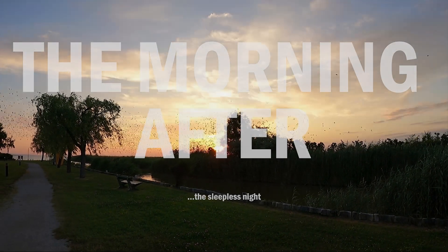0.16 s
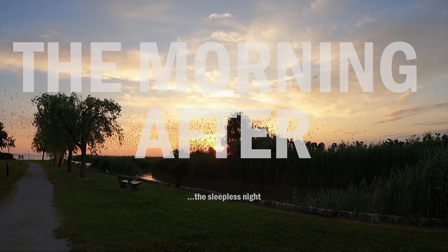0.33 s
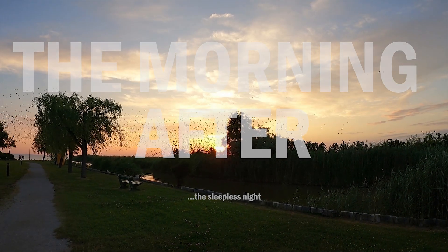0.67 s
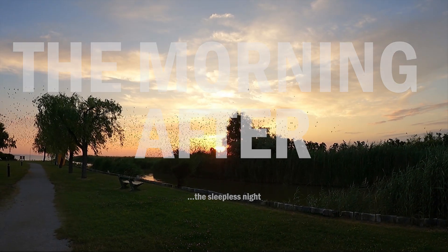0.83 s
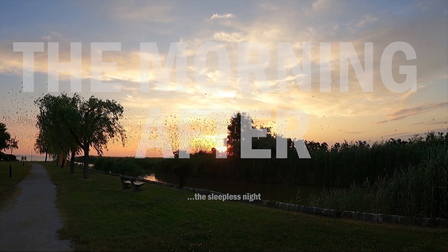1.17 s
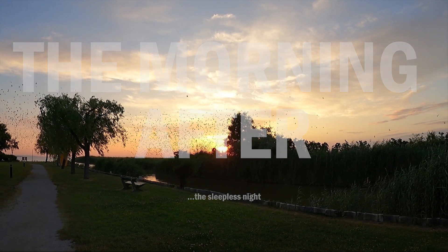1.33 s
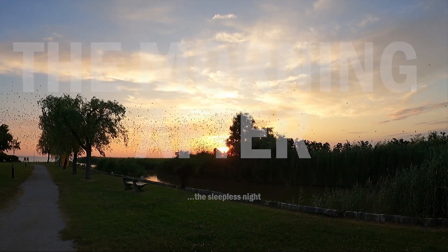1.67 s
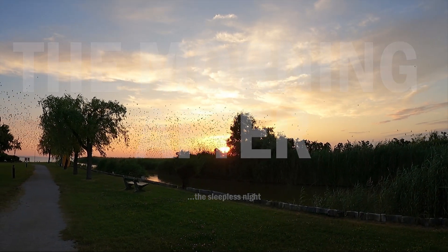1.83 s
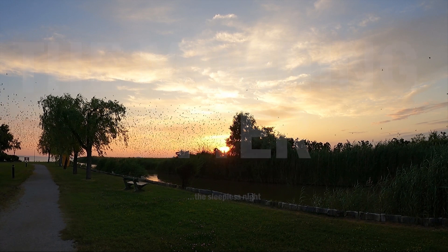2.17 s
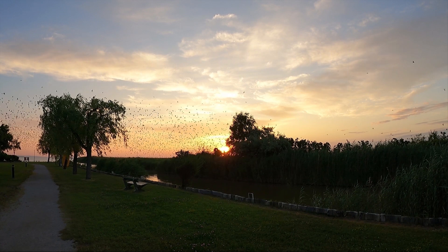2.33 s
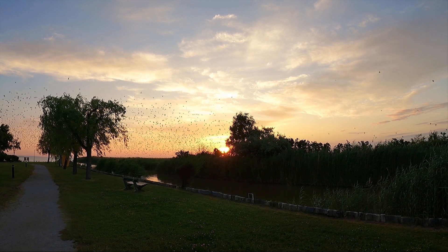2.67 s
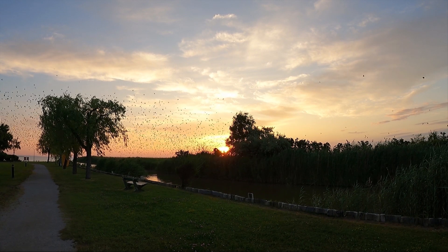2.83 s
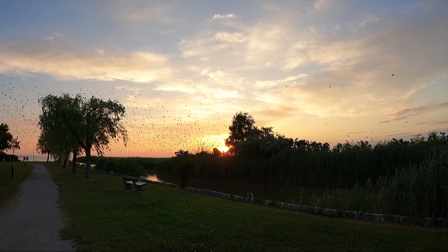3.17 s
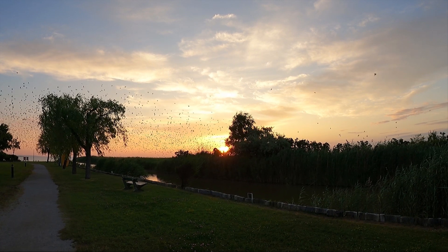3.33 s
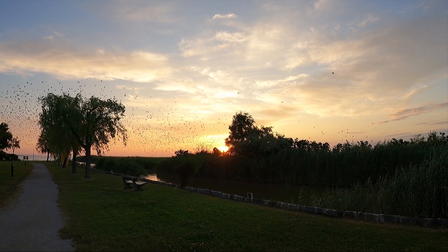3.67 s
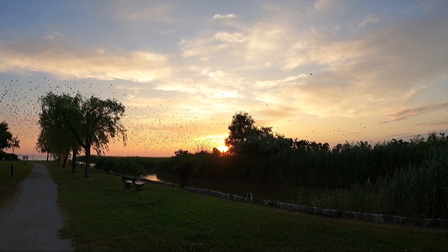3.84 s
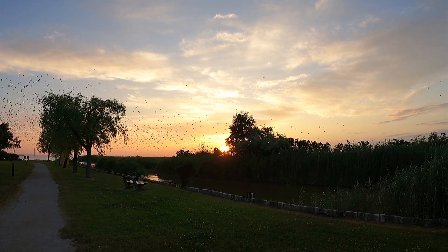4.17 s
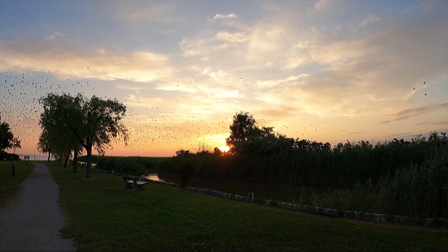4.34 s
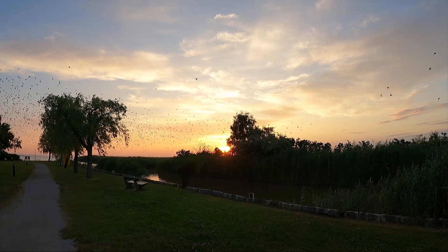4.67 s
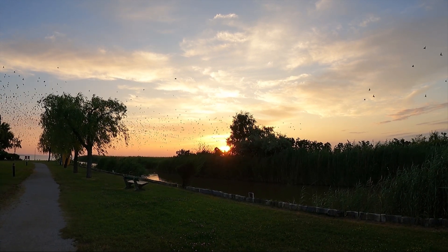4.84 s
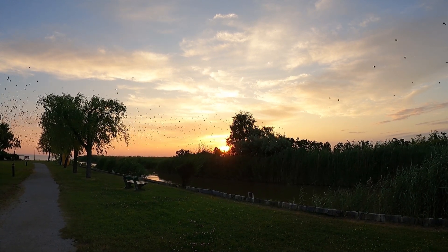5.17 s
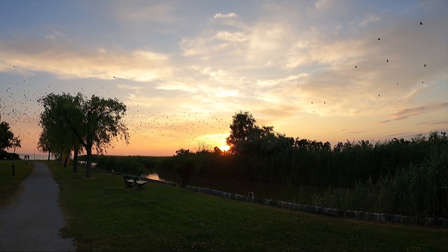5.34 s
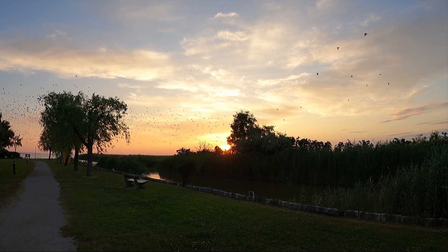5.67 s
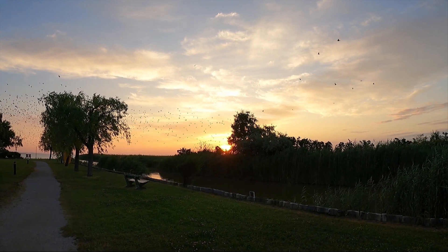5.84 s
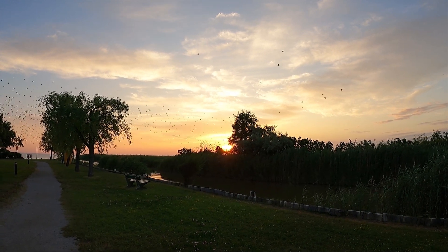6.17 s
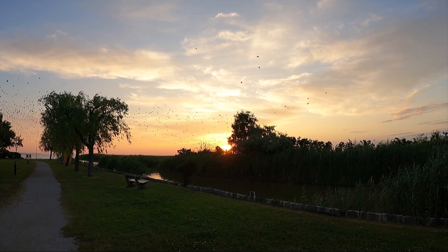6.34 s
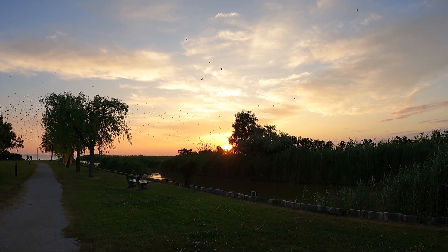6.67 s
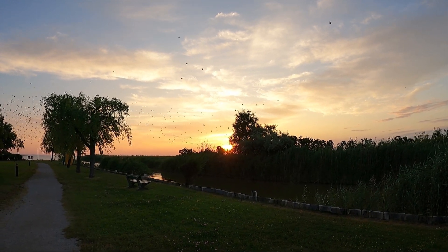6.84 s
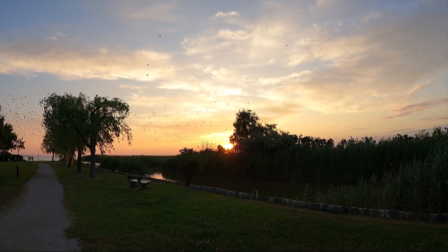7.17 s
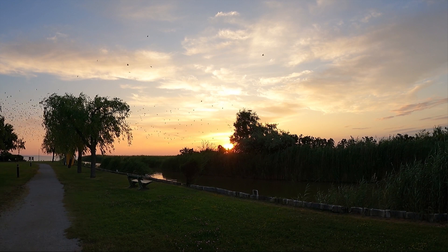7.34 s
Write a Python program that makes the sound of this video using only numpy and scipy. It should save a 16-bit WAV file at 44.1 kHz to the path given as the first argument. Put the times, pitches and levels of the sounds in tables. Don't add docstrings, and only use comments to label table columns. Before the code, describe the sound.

Many small birds chatter with hoarse, fast-trilled chirps, mostly to the left, over soft airy rush, low wind rumble and occasional handling ticks.

```python
import sys
import numpy as np
from scipy import signal
from scipy.fft import rfft, irfft
from scipy.io import wavfile
from scipy.ndimage import uniform_filter1d

SR = 44100
rng = np.random.default_rng(int(sys.argv[2]) if len(sys.argv) > 2 else 0)


def nominal_scale(level):
    x = np.asarray(level, float) / 20
    return 10 ** x


def store_wav(level_fs):
    pcm = np.round(np.clip(np.atleast_2d(level_fs), -1, 1) * 32767)
    wavfile.write(sys.argv[1], SR, pcm.T.astype(np.int16))


N = 330849


def evened(x):
    return x / np.sqrt(np.mean(x ** 2) + 1e-20)


def read(points, hz):
    f, value = np.transpose(points)
    return np.interp(np.log(hz + 1), np.log(f + 1), value)


def columns(rows, t):
    s, *rest = np.transpose(rows)
    return [np.interp(t, s, c) for c in rest]


def add(mix, s, sound):
    part = mix[:, round(s * SR):][:, :sound.shape[1]]
    part += sound[:, :part.shape[1]]


def wander(size, s):
    n = max(int(s * SR), 2)
    smooth = uniform_filter1d(rng.standard_normal(size), n)
    return evened(uniform_filter1d(smooth, n))


def placed(x, pan_db, lag):
    late = np.interp(np.arange(len(x)) - lag, np.arange(len(x)), x)
    pair = np.array([late * nominal_scale(pan_db / 2), x / nominal_scale(pan_db / 2)])
    return pair * 2 / np.hypot(nominal_scale(pan_db / 2), nominal_scale(-pan_db / 2)) / np.sqrt(2)


def hiss(field_db, patchy_db, size):
    # f/Hz, likeness (0 to 1)
    likeness = [(25, 0.54), (60, 0.88), (160, 0.93), (1150, 0.67), (1880, 0.39), (3000, 0.51)]
    lag_s = .00006
    frames = 4 * N // size + 5
    hz = np.fft.rfftfreq(size, 1 / SR)[:, None]
    a, b, c, d, patches = rng.standard_normal((frames, len(hz), 5)).T
    patches = evened(uniform_filter1d(uniform_filter1d(patches, 12, 0), 12, 1))
    same = np.clip(read(likeness, hz), -1, 1)
    right = a + 1j * b
    left = same * right * np.exp(-2j * np.pi * hz * lag_s) + np.sqrt(1 - same ** 2) * (c + 1j * d)
    z = np.array([left, right]) * nominal_scale(patchy_db * patches)
    z /= np.sqrt(np.mean(abs(z) ** 2))
    t = (np.arange(frames) * size / 4 / SR)[None]
    return signal.istft(z * nominal_scale(field_db(hz, t)), nperseg=size, noverlap=size * 3 // 4)[1][:, :N]


def churr(hz, trill_hz, swing, hoarse, gate_db):
    # multiple of the main pitch, level/dB
    partials = [(1.329, 7.5), (1.67, 0.5), (2, -14.5), (2.5, -26), (3, -25)]
    n = len(hz)
    beat = 2 * np.pi * (np.cumsum(trill_hz * (1 + .11 * wander(n, .015))) / SR + rng.random())
    half = beat / 2 + 2 * np.pi * rng.random()
    flutter = np.sin(beat) + 0.577 * np.sin(half)
    turns = 2 * np.pi * np.cumsum(hz * (1 + swing * flutter + hoarse * wander(n, 0.0012))) / SR
    stroke = 0.26 * np.cos(half) - np.cos(beat + rng.random() - .5)
    pulse = evened(nominal_scale(gate_db * stroke + 3.93 * wander(n, 0.0012)))
    upper = sum(nominal_scale(db) * np.sin(k * turns + 1.7 * wander(n, 0.00081)) for k, db in partials)
    under = nominal_scale(-15.5) * np.sin(.75 * turns + wander(n, 0.00083))
    return pulse * (np.sin(turns) + under) * np.sqrt(2), np.sqrt(pulse) * upper


def air():
    # t/s, level/dB, extra level of the low part/dB
    rush = [
        (0, -58.5, 5),
        (1.5, -57, -3.5),
        (4, -58.5, -5.5),
        (7.5, -59.5, -10),
    ]
    # f/Hz, level per Hz/dB
    colour = [(120, -25), (200, 0.5), (280, -10), (550, -3.5), (842, -7.5), (1010, -4), (3020, -1.5),
              (4090, -2), (6710, -10.5), (10800, -31.5), (12100, -33.5), (13900, -67)]

    def field_db(hz, t):
        level_db, low_db = columns(rush, t)
        return read(colour, hz) + level_db + low_db / (1 + (hz / 900) ** 2)
    return hiss(field_db, patchy_db=1.57, size=1024) * nominal_scale(-1.0)


def wind():
    # t/s, level/dB
    gusts = [(0.0, -41.5), (2.09, -47.5), (2.28, -36), (2.48, -47), (3.05, -47), (3.65, -40), (3.68, -38),
             (3.89, -48), (4.55, -46), (4.58, -48), (5.28, -47), (5.56, -54.5), (5.7, -45), (6.18, -54.5),
             (6.52, -42.5), (6.56, -51.5), (6.98, -43), (7.5, -51)]
    # f/Hz, level per Hz/dB
    colour = [(7.1, -56), (12, -6.5), (32, 7), (51, -2), (177, -19), (246, -34), (320, -33), (420, -37),
              (700, -120)]

    def field_db(hz, t):
        return read(colour, hz) + columns(gusts, t)[0]
    return hiss(field_db, patchy_db=1.0, size=2048) * nominal_scale(2.5)


def far_flock(count=40, size=500):
    # t/s, level/dB
    loudness = [
        (0, -50),
        (.6, -61),
        (1.1, -40.5),
        (2.3, -49),
        (4.4, -46),
        (6.3, -47.5),
        (7.5, -38),
    ]
    spread_db = 4.0
    out, calls = np.zeros((2, N)), []
    for length, pitch, pan, lag in rng.random((count, 4)):
        u = np.linspace(0, 1, int((0.0529 + 0.1008 * length) * SR))
        hz = (2500 + 2300 * np.sqrt(pitch)) * (1.03 - 0.06006 * u)
        tone, upper = churr(hz, 70 + 45 * length, swing=0.06, hoarse=0.0297, gate_db=1.0)
        call = (tone + nominal_scale(-22.5) * upper) * np.sin(np.pi * u)
        calls.append(placed(call, 10 * pan - 1.5, 6 * lag))
    for s, bird, loud in rng.random((size, 3)):
        add(out, s * N / SR, calls[int(bird * count)] * nominal_scale(spread_db * loud))
    return evened(out) * nominal_scale(columns(loudness, np.arange(N) / SR)[0])


def trees(x):
    t = np.arange(int(.25 * SR)) / SR
    chosen = rng.random((3, len(t))) < .03
    common, left, right = rng.standard_normal((3, len(t))) * chosen
    taps = (common + .6 * np.array([left, right])) * (t > .002) * nominal_scale(-60 * t / .15)
    return signal.fftconvolve(x, taps / np.linalg.norm(taps[0]), axes=1)[:, :N]


def ticks():
    # t/s, peak level/dB, ring f/Hz, thump level/dB, crack level/dB
    knocks = [
        (.178, -40, 1200, -6, 0),
        (1.779, -37, 1900, -12, 0),
        (2.22, -40, 2500, -20, 6),
        (2.279, -24, 700, 1, -2),
        (2.815, -39, 2500, -10, 6),
        (4.327, -25, 960, -10, -4),
        (4.967, -31, 620, -10, 0),
    ]
    out, t = np.zeros((2, N)), np.arange(1500) / SR
    for s, peak_db, hz, thump_db, crack_db in knocks:
        ring = np.sin(2 * np.pi * hz * t) * nominal_scale(-60 * t / .01)
        thump = nominal_scale(thump_db) * np.sin(2 * np.pi * 330 * t) * nominal_scale(-60 * t / 0.011)
        crack = nominal_scale(crack_db) * wander(len(t), .00012) * nominal_scale(-60 * t / 0.003)
        knock = -nominal_scale(peak_db) * (ring + thump + crack) * np.minimum(t / 0.00041, 1)
        add(out, s, placed(knock, pan_db=5.0, lag=1.47))
    return out


def peeps():
    # t/s, f/Hz, level/dB
    blips = [
        (1.707, 4220, -29),
        (2.54, 3810, -32),
        (5.956, 3960, -29.5),
        (6.21, 3710, -32),
        (7.331, 4000, -29.5),
        (7.388, 5300, -33.5),
    ]
    out, t = np.zeros((2, N)), np.arange(500) / SR
    for s, hz, level_db in blips:
        blip = np.sin(2 * np.pi * hz * t) * np.minimum(t / 0.00069, 1) * nominal_scale(level_db + 9.0 - 60 * t / 0.039)
        add(out, s, placed(blip * signal.windows.tukey(len(t), .2), pan_db=7.8, lag=2.4))
    return out


def whistles():
    # t/s, f/Hz, level/dB
    notes_sung = [
        [(1.352, 3900, -36), (1.368, 5050, -34), (1.398, 5800, -37), (1.43, 4000, -35)],
        [(4.73, 4400, -37), (4.742, 5600, -36), (4.754, 4500, -33), (4.762, 5700, -38), (4.774, 5900, -38),
         (4.79, 4300, -36)],
        [(5.785, 5800, -48), (5.83, 5500, -46)],
        [(5.87, 5400, -52), (5.89, 6500, -52)],
        [(7.42, 6150, -44), (7.5, 6290, -40)],
    ]
    out = np.zeros((2, N))
    for rows in notes_sung:
        t = np.arange(rows[0][0] - .004, rows[-1][0] + 0.0062, 1 / SR)
        hz, level_db = columns(rows, t)
        hz = uniform_filter1d(hz, 120) * (1 + .007 * wander(len(t), .004))
        tone = np.sin(2 * np.pi * np.cumsum(hz) / SR) * nominal_scale(level_db + 1.5 * wander(len(t), .003))
        add(out, t[0], placed(tone * signal.windows.tukey(len(t), .2), pan_db=9, lag=3))
    return out


def strain_db(t):
    # t/s, hold/s, overtone level/dB
    strains = [(.55, .01, -60.5), (0.696, .14, -59), (0.927, 0.0092, -54.5), (1.085, 0.21, -54.5),
               (1.4, .01, -56), (1.535, .01, -50), (1.68, .01, -57.5), (1.84, 0.0091, -52),
               (2.072, 0.039, -51.5), (2.496, 0.035, -53.5), (2.652, 0.0091, -49.5), (2.817, .01, -61),
               (2.936, .03, -54.5), (3.203, 0.038, -51.5), (3.6, 0.011, -51.5), (3.83, .1, -57.5),
               (3.976, .05, -53.5), (4.545, 0.24, -51.5), (4.948, .03, -50.5), (5.15, .01, -55.5),
               (5.367, 0.23, -52.5), (5.796, 0.05, -46.5), (5.997, .01, -56), (6.151, 0.011, -50),
               (6.56, 0.079, -56.5), (7.024, 0.22, -52), (7.3, 0.17, -56)]
    rise_db_per_s, fall_db_per_s, relaxed_db = 280, 144, -66
    s, hold, db = np.transpose(strains)[:, :, None]
    before, after = np.maximum(s - t, 0), np.maximum(t - s - hold, 0)
    each = db - rise_db_per_s * before - fall_db_per_s * after
    return np.maximum(each.max(0), relaxed_db)


def near_birds():
    # t/s, length/s, middle f/Hz, peak level/dB
    falling = [(.69, 0.22, 4105, -40.5), (.92, 0.17, 3990, -35), (1.08, 0.19, 4204, -32),
               (1.62, 0.062, 4893, -43), (1.78, .23, 3533, -34), (1.815, 0.082, 4760, -34),
               (2.473, 0.1, 3880, -40.5), (2.61, 0.14, 3970, -35), (2.734, 0.08, 3050, -44.5),
               (2.885, 0.069, 4530, -37), (2.99, .14, 4000, -36), (3.19, .15, 3853, -35),
               (3.51, 0.12, 3950, -37.5), (3.615, .12, 4200, -32.5), (3.646, .06, 3073, -42),
               (3.796, 0.12, 4540, -36.5), (4.0, 0.1155, 3975, -33), (4.11, 0.14, 4300, -35.5),
               (4.226, .09, 3670, -35), (4.627, 0.15, 3900, -32.5), (4.766, 0.053, 3170, -42),
               (4.93, .1, 3990, -34), (5.184, 0.11, 3380, -37.5), (5.35, 0.1, 3990, -35),
               (5.503, 0.1, 4150, -29), (5.573, .05, 4970, -38), (6.1, 0.13, 4540, -35.5),
               (6.49, 0.15, 3770, -35.5), (7.036, .125, 4290, -27), (7.17, 0.086, 3750, -31.5)]
    # t/s, length/s, middle f/Hz, peak level/dB
    held = [(1.14, 0.161, 3450, -39), (1.283, 0.18, 4120, -40), (1.51, .06, 4400, -39.5),
            (1.56, 0.053, 3950, -35), (1.689, 0.052, 4280, -42), (2.04, .19, 4230, -33.5),
            (2.775, 0.068, 3850, -38.5), (2.83, 0.087, 3014, -45.5), (2.914, 0.087, 3880, -34.5),
            (3.36, 0.081, 3735, -37.5), (3.802, 0.11, 3760, -37.5), (3.907, 0.094, 4095, -32),
            (4.464, 0.11, 4010, -38.5), (4.51, 0.071, 5060, -44), (4.563, 0.072, 4300, -34.5),
            (4.772, 0.12, 4230, -35.5), (5.039, 0.18, 3890, -31.5), (5.44, 0.048, 3910, -33),
            (5.61, 0.097, 4210, -33), (5.677, 0.087, 4003, -35.5), (5.9, 0.198, 4017, -36),
            (5.973, 0.083, 4880, -38), (6.2, 0.0476, 3864, -36), (6.397, 0.1, 4630, -41.5),
            (6.635, 0.13, 4370, -36), (6.774, 0.034, 3650, -35.5), (6.983, 0.066, 4010, -36.5),
            (7.03, 0.12, 3050, -41.5), (7.274, 0.067, 3950, -35), (7.36, 0.128, 4054, -30)]
    # t/s, length/s, middle f/Hz, peak level/dB
    faint = [(.16, 0.071, 4060, -45.5), (.37, 0.053, 4030, -50), (.52, .07, 4248, -45),
             (1.062, 0.27, 6970, -54), (1.625, 0.1, 5740, -43), (1.5, .11, 3280, -47),
             (2.055, 0.086, 6130, -56), (2.12, 0.13, 3460, -42), (4.54, .2, 3174, -45),
             (4.95, 0.107, 3394, -36), (7.2, 0.237, 2900, -47), (3.17, 0.15, 5700, -43),
             (3.19, 0.096, 4500, -42.5), (3.21, .07, 7780, -62), (4.534, 0.09, 7730, -63),
             (4.574, .115, 6920, -54), (4.9, .115, 6500, -53), (5.085, .115, 5900, -45),
             (5.11, 0.058, 4650, -34.5), (5.43, .07, 4670, -34.5), (5.503, 0.082, 6090, -60),
             (6.008, .115, 2900, -44.5), (6.113, 0.096, 7650, -58), (6.13, .1, 3200, -43.5),
             (6.72, .08, 2500, -49), (6.92, 0.095, 2515, -49.5), (7.007, .11, 6200, -53),
             (7.233, 0.084, 5390, -46), (7.349, 0.1, 6330, -46.5), (7.361, 0.059, 5340, -44.5)]
    # t/s, left over right level/dB
    perch = [(0.0, 13), (0.46, 9), (1.79, 8.5), (1.94, 6), (2.21, 10), (2.71, 6), (2.76, 7), (5.99, 10),
             (6.06, 8), (6.14, 1), (6.39, 17.5), (7.5, 6)]
    # slide in Hz per s, start and end dB, peak place (0 to 1), extra left-right dB
    songs = ((falling, (-3500, -6, -10, .38, .1)),
             (held, (-400, -5, -6, .5, .1)),
             (faint, (-900, -6, -8, .42, -1.5)))
    perch_spread_db = 3
    out, harsh = np.zeros((2, 2, N))
    for calls, (slide, start_db, end_db, peak, side_db) in songs:
        for s, length, mid_hz, peak_db in calls:
            t = np.arange(max(s - .02, 0), s + length + 0.022, 1 / SR)
            u = np.clip((t - s) / length, 0, 1)
            hz = mid_hz + slide * length * (u - .5)
            swell_db = start_db * (1 - u / peak) ** 2
            fade_db = end_db * ((u - peak) / (1 - peak)) ** 2
            level_db = peak_db + np.where(u < peak, swell_db, fade_db)
            rate, lag, place = rng.random(3)
            swing = 0.037 + .035 * np.exp(-((hz - 4500) / 790) ** 2)
            tone, upper = churr(hz, 75 + 25 * rate, swing, hoarse=0.0201, gate_db=1.5)
            shape = nominal_scale(level_db) * signal.windows.tukey(len(t), 0.036 * SR / len(t))
            pan_db = columns(perch, s)[0] + side_db + perch_spread_db * (place - .5)
            add(out, t[0], placed(tone * shape, pan_db, 1.5 + 2 * lag))
            add(harsh, t[0], placed(upper * shape, pan_db, 1.5 + 2 * lag))
    harsh /= np.sqrt(abs(uniform_filter1d((harsh ** 2).mean(0), size=1200)) + nominal_scale(-110))
    coarse = np.arange(0, N + 200, 200) / SR
    return out + harsh * nominal_scale(np.interp(np.arange(N) / SR, coarse, strain_db(coarse)) + 6.5)


def scene():
    birds = near_birds() + whistles() + peeps() + far_flock()
    return birds + nominal_scale(-10.0) * trees(birds) + air() + wind() + ticks()


def top_cut(x):
    return signal.sosfilt(signal.butter(12, 14050, fs=SR, output="sos"), x)


def record(dry):
    # f/Hz, level/dB
    side_kept = [(5500, -0.5), (7500, -14), (9500, -23.5), (11000, -10.5), (13000, -5)]
    mid, side = (dry[0] + dry[1]) / 2, (dry[0] - dry[1]) / 2
    side = irfft(rfft(side) * nominal_scale(read(side_kept, np.fft.rfftfreq(N, 1 / SR))), N)
    return top_cut(np.array([mid + side, mid - side]))


dry = scene()
out = record(dry)
store_wav(out)
```